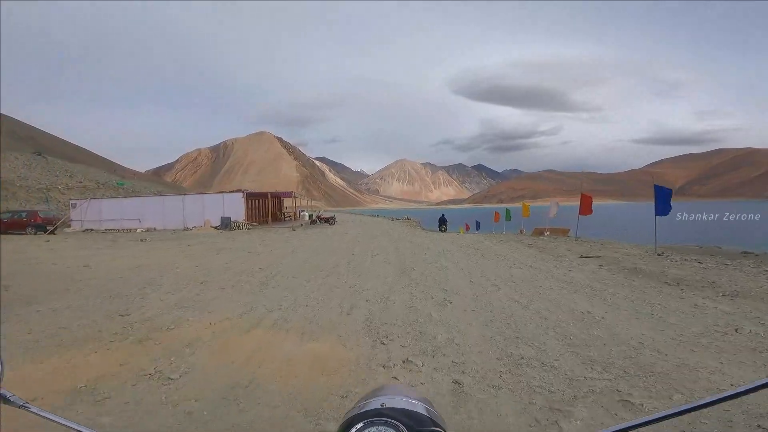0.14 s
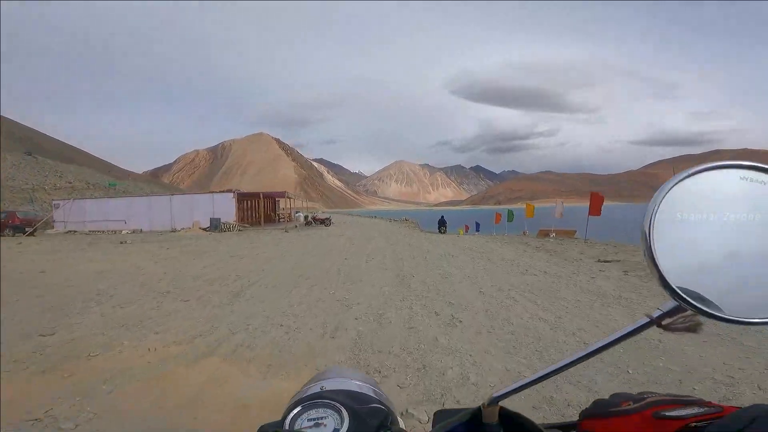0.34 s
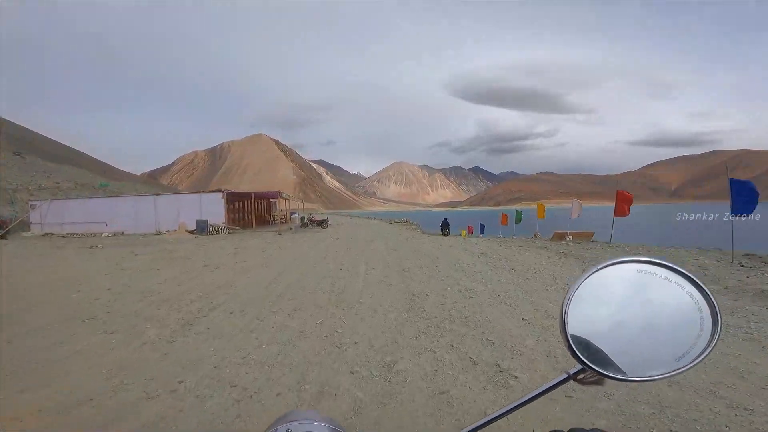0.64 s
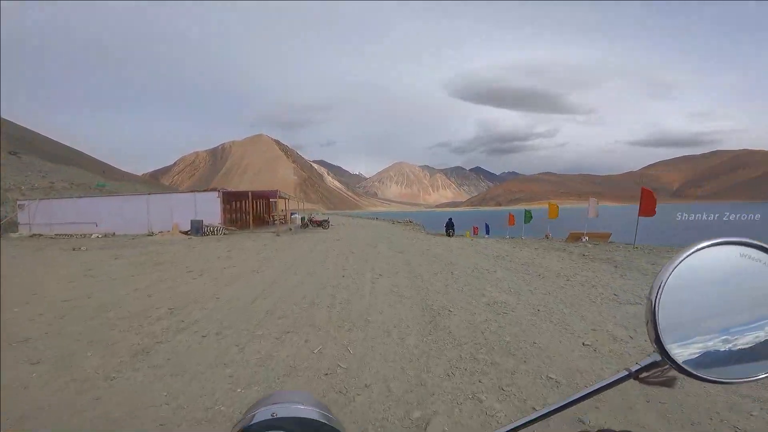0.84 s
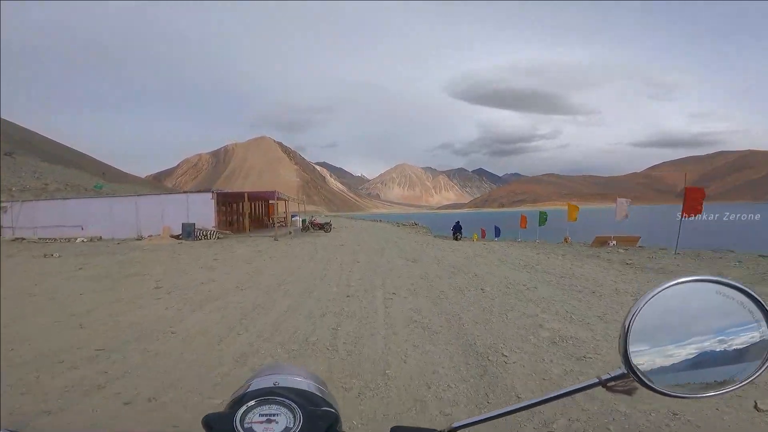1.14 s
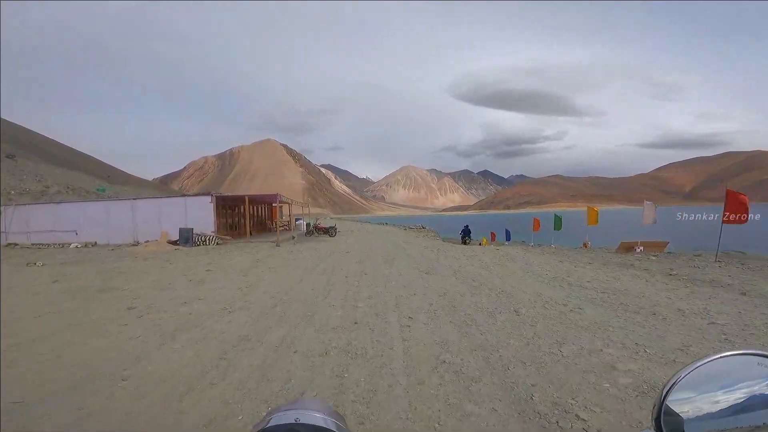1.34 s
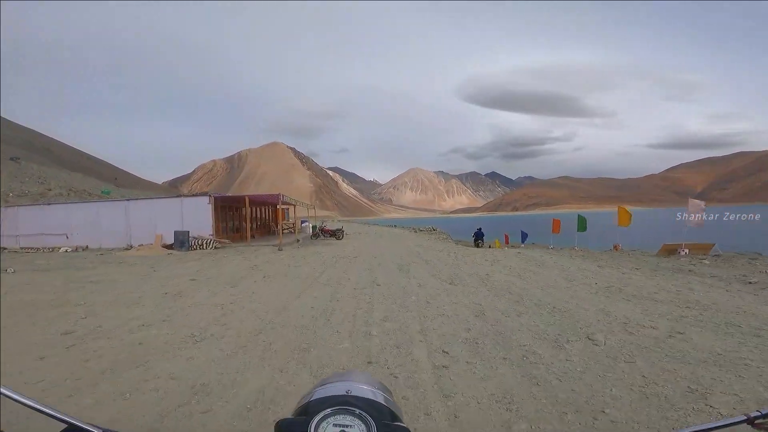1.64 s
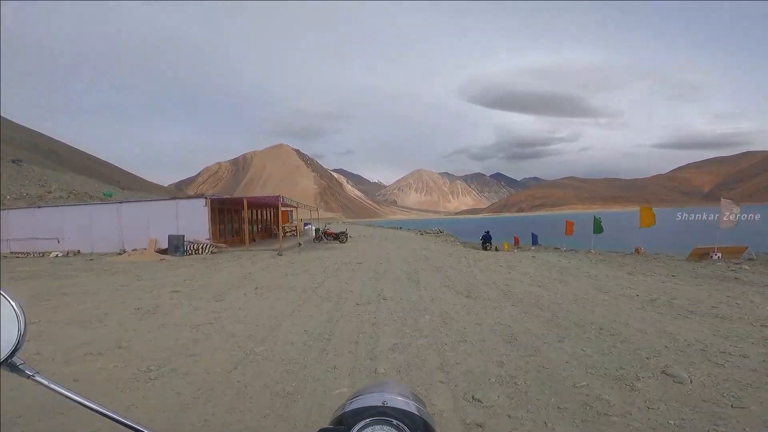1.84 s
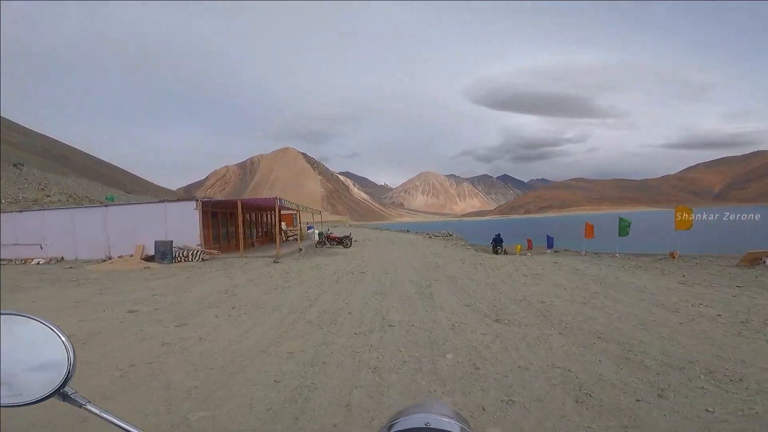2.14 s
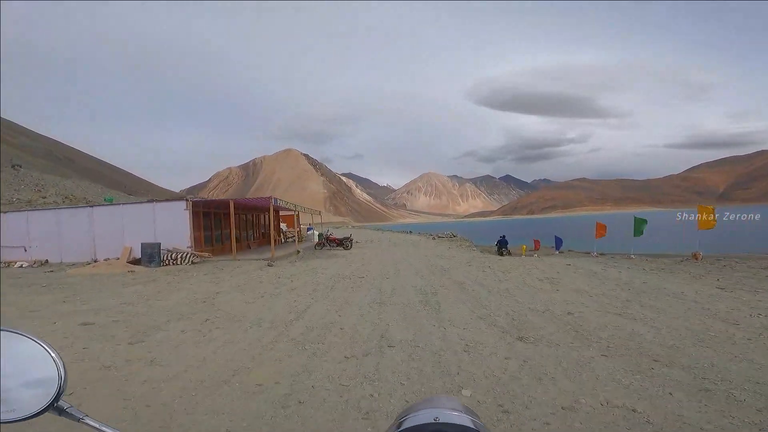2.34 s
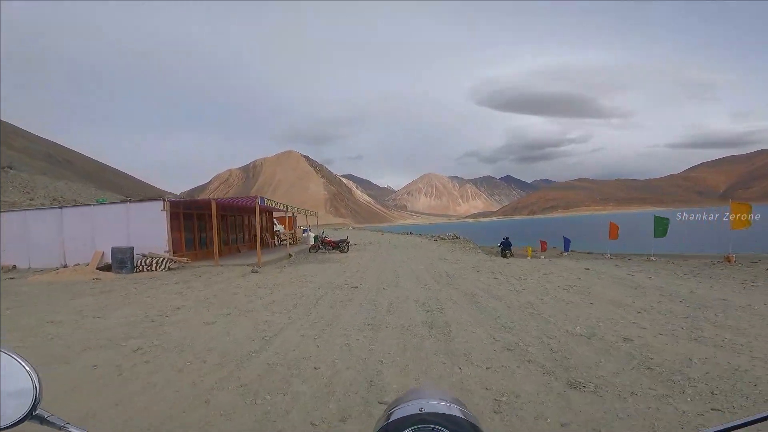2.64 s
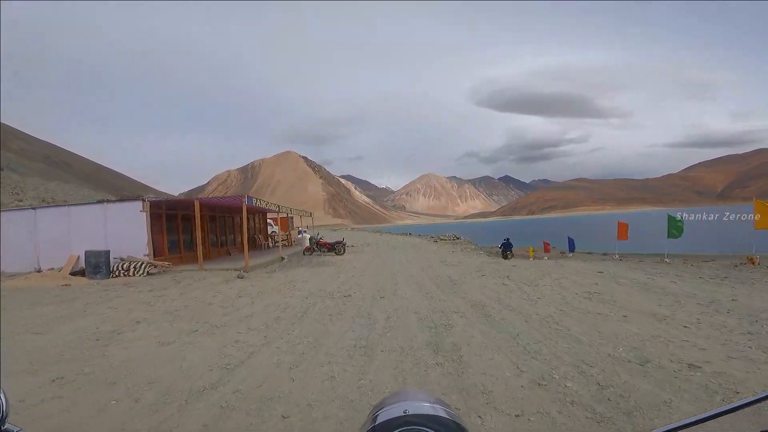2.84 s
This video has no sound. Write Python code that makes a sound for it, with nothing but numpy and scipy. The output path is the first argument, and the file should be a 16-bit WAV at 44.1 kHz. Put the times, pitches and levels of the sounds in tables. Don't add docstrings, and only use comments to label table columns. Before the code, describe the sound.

A single-cylinder motorcycle thumps slowly, sags, then pulls away louder and faster on open gravel; wind roars and slams the rider's small microphone, with scattered stone knocks and brief metallic ticks.

```python
import sys
import numpy as np
from scipy import signal
from scipy.io import wavfile
from scipy.ndimage import uniform_filter1d, minimum_filter1d

SR = 44100
rng = np.random.default_rng(int(sys.argv[2]) if len(sys.argv) > 2 else 0)


def volts_from_db(level):
    exponent = np.asarray(level, float) / 20
    return 10 ** exponent


def store_pcm(level_fs):
    pcm = np.round(np.clip(level_fs, -1, 1) * 32767).astype(np.int16)
    wavfile.write(sys.argv[1], SR, np.atleast_2d(pcm).T)


N = 132300

# time_s, firings_per_s
FIRING_RATE = [
    (0.0, 9.008),
    (0.35, 7.912),
    (0.7, 7.373),
    (1.1, 7.365),
    (1.5, 7.269),
    (1.8, 7.573),
    (2.0, 9.252),
    (2.2, 10.88),
    (2.6, 12.656),
    (3.0, 14.432),
]
# time_s, level_db
THROTTLE = [(0, -7), (.42, -9.5), (.6, -10), (.95, -23.5), (1.25, -11.5), (1.5, -9.5), (1.66, -9.5),
            (1.88, -3), (2.02, -7.5), (2.22, 1.5), (2.47, 1), (2.56, -3.5), (2.72, 2.5), (2.82, -4),
            (3, -1.5)]
# pitch_hz, gain_db, t60_s
PIPE_MODES = [
    (76.2, -4, 0.068),
    (127.96, -20.5, 0.16),
]
# time_s, level_db, mid_roar_relative_db
WIND_LEVEL = [(0, -27, -13), (.19, -22.5, -14.5), (.3, -23, -21), (.44, -22.5, -19.5), (.62, -26.5, -15),
              (.78, -27, -6.5), (.98, -28.5, -0.5), (1.05, -23.5, -23.5), (1.19, -26, -13.5),
              (1.5, -26.5, -14), (1.65, -30, -15.5), (1.87, -27, -9.5), (2.18, -28.5, -17),
              (2.27, -26, -4.5), (2.45, -24, -1.5), (2.6, -25.5, -19), (2.75, -23.5, -17), (2.88, -31, -3)]
# pitch_hz, density_db_per_hz
WIND_COLOUR = [(45, -11), (150, -12.5), (450, -18), (1000, -38.5), (2500, -53), (4500, -74.5),
               (8000, -74.5), (16000, -94.5)]
# time_s, gain_db
SHELTER = [(0, -1), (.12, -1.5), (.3, -3), (.55, -2), (.65, -3.5), (.9, 0), (1.1, -4), (1.3, -4.5),
           (1.55, 0), (1.7, -4.5), (1.95, 0.5), (2.1, -1), (2.3, 1.5), (2.5, -3), (2.65, -2), (2.85, -1.5),
           (3, 7)]
# start_s, size_db
SLAMS = [(-.04, -0.5), (0.077, -2), (0.232, 3.5), (0.438, -2.5), (.5, -5.5), (0.571, 3), (0.819, -1.5),
         (1.013, 6), (1.211, 3), (1.41, 5.5), (1.575, 5), (1.798, -10), (1.919, 1), (1.999, -3),
         (2.119, -2.5), (2.279, -2), (2.472, 2.5), (2.6, 2.5), (2.678, -3.5), (2.792, -1), (2.959, -3)]
# time_s, level_db
FLUTTER = [(0.04, -22), (0.2, -20.5), (0.27, -12), (0.54, -19), (0.64, -22.5), (1.6, -21.5), (1.68, -28),
           (2.01, -8.5), (2.03, -20), (2.17, -15), (2.92, -23), (2.95, -25.5)]
# time_s, level_db
GRAVEL = [(0, -54), (.16, -70.5), (.26, -47), (.45, -62), (.68, -54), (.75, -47.5), (.9, -52), (1.08, -59),
          (1.17, -48.5), (1.25, -59), (1.5, -60.5), (1.69, -62), (1.79, -50.5), (1.93, -81), (2.2, -76.5),
          (2.44, -69.5), (2.6, -68.5), (3, -59)]
# pitch_hz, gain_db, t60_s
GRIT_RINGS = [
    (1600, 2, 0.0038),
    (2870, 2.5, 0.00078),
    (4930, -1.5, 0.00091),
    (7960, -3, 0.0007),
]
# centre_s, level_db, pitch_hz, length_s
SQUEAKS = [
    (1.021, -48, 4080, .006),
    (1.202, -45, 5000, .004),
    (.757, -53, 7700, .003),
    (2.727, -56, 7800, .005),
]
# start_s, peak_db, pitch_hz
GUSTS = [(.18, -20.5, 276), (.24, -31, 680), (.39, -22.5, 272), (.46, -23, 336), (.53, -24.5, 255),
         (.79, -29.5, 818), (.99, -24, 506), (1.04, -33, 420), (1.15, -23, 300), (1.18, -29.5, 500),
         (1.54, -27.5, 420), (1.8, -29, 494), (2.25, -29.5, 794), (2.46, -20.5, 207), (2.76, -21.5, 215),
         (2.93, -23, 239)]
# start_s, peak_db, pitch_hz
SPRAYS = [
    (.225, -44, 3150),
    (.24, -41, 1680),
    (.27, -54, 3180),
    (.77, -52, 3650),
    (1.16, -37.5, 1510),
    (1.76, -49.5, 2790),
    (1.79, -42.5, 1690),
    (1.97, -44, 1460),
    (2.74, -44.5, 1770),
    (2.93, -48, 2610),
]
# start_s, peak_db, low_part_relative_db, ring_hz, body_hz
TICKS = [(0.234, -42, -11.5, 7900, 2000), (0.2377, -36.5, -13, 8140, 3000), (.575, -54, 11, 7800, 3880),
         (.64, -48, 3, 7900, 3000), (0.7281, -22.5, 5.5, 7900, 1370), (0.8485, -33, 5, 8100, 1900),
         (.9522, -23.5, -1.5, 7960, 2550), (1.031, -48, 6.5, 6900, 4000), (1.1052, -27.5, -6, 8370, 3360),
         (1.1675, -43, 1.5, 8100, 3460), (1.193, -42.5, -8, 8400, 2620), (1.1994, -51, 7.5, 6700, 4940),
         (1.217, -44, 0, 6200, 2580), (1.404, -46.5, 10, 8700, 1700), (1.593, -48, 8, 8450, 3770),
         (2.0208, -55, 9, 7700, 2820), (2.4174, -41, 0, 7200, 2530), (2.4312, -43.5, 0.5, 8100, 3420)]
# start_s, peak_db, pitch_hz
STONES = [(.261, -36.5, 3170), (.271, -32, 1810), (.282, -34, 1500), (.6694, -45, 2500),
          (1.0076, -35, 1660), (1.139, -45, 4600), (1.173, -24, 1600), (1.1902, -26, 1830),
          (1.209, -30, 2380), (1.5589, -33.5, 2000), (1.7449, -35, 3000), (1.7704, -31, 1830),
          (1.795, -41, 2560), (1.82, -33.5, 2700), (1.8357, -32, 2350), (1.838, -45.5, 4760),
          (1.89, -47, 2150), (1.982, -51, 4400), (2.9248, -25, 1720), (.7285, -26, 1140), (.729, -33, 2920),
          (.851, -17.5, 1400), (.953, -16.5, 1470), (2.4309, -49.5, 5400), (.235, -39, 2000),
          (.25, -42, 3400), (.296, -40, 3000), (.315, -35, 1900), (1.78, -46, 2950), (1.805, -30, 1910),
          (2.0228, -31, 1600), (.852, -40, 4150), (.9535, -22.5, 3050), (1.1065, -33, 3560),
          (.729, -19, 5000)]
# start_s, peak_db, pitch_hz
POPS = [(0.444, -20, 463), (0.493, -19.5, 480), (0.706, -27, 637), (0.907, -26.5, 748), (1.549, -23, 461),
        (1.574, -16, 527), (1.626, -32, 466), (1.935, -27.5, 558), (2.199, -22, 504), (2.223, -19.5, 673),
        (2.62, -25.5, 482), (2.704, -18, 458), (2.883, -33.5, 536)]


def level(x, db):
    return x * volts_from_db(db) / np.sqrt(np.mean(x ** 2))


def band(x, hz, width_hz):
    return signal.lfilter(*signal.iirpeak(min(hz, .45 * SR), hz / width_hz, fs=SR), x)


def steep(x, hz, width_hz):
    return band(band(x, hz, width_hz), hz, width_hz)


def noise():
    return rng.standard_normal(N)


def ring(x, hz, t60_s):
    pole = np.exp(2j * np.pi * hz / SR - np.log(1000) / (t60_s * SR))
    return signal.lfilter([1], [1, -pole], x).imag


def walk(rate_hz):
    hold = int(SR / rate_hz)
    held = np.repeat(rng.standard_normal(N // 100), hold)[:N + hold]
    return 1.07 * uniform_filter1d(uniform_filter1d(held, hold), hold)[:N]


def curve(table, index):
    table = np.array(table)
    return np.interp(np.arange(N) / SR, table[:, 0], table[:, index])


def push(at, size, length_s):
    x = np.zeros(N + SR)
    np.add.at(x, np.maximum(at, 0), size)
    shape = np.hanning(int(length_s * SR) + 2)
    return signal.fftconvolve(x, shape / shape.sum())


def burst(n, hz, width_hz, t60_s, rise_s):
    t = np.arange(len(n)) / SR
    x = steep(n, hz, width_hz)
    return x / np.std(x) * np.exp(-np.log(1000) * t / t60_s) * np.minimum(t / rise_s, 1)


def knocks(table, t60_s, q):
    out = np.zeros(N + SR)
    for (s, db, hz), n in zip(table, rng.standard_normal((40, 2048))):
        out[int(s * SR):][:2048] += volts_from_db(db) * burst(n, hz, hz / q, t60_s, rise_s=.0015)
    return out[:N]


def swells(table, q):
    out = np.zeros(N + SR)
    size = int(.07 * SR)
    for (s, db, hz), n in zip(table, rng.standard_normal((20, 8192))):
        x = steep(n, hz, hz / q)
        out[int(s * SR):][:size] += volts_from_db(db) * x[-size:] / np.std(x) * np.hanning(size)
    return out[:N]


def engine():
    start_phase, pipe_lead_s = .476, .0064
    push_s, gas_s, gas_db = .0027, .031, -41.5
    phase = start_phase + np.cumsum(curve(FIRING_RATE, index=1)) / SR
    at = np.flatnonzero(np.diff(np.floor(phase))) - int(pipe_lead_s * SR)
    scatter_db = .94 * rng.standard_normal(64)[:len(at)]
    size = volts_from_db(curve(THROTTLE, index=1)[at] + scatter_db)
    pulses = ring(push(at, size, push_s)[:N], hz=115.2, t60_s=.19) * 550 / SR
    pipe = -sum(volts_from_db(db) * ring(pulses, hz, t60_s) for hz, db, t60_s in PIPE_MODES)
    puff = push(at, size, gas_s)[:N] * gas_s * SR
    hiss = level(steep(noise(), 600., 760.), 0)
    return pipe + volts_from_db(gas_db) * puff * hiss


def wind():
    roar_hz, roar_octaves, roar_slope, roar_ref_db = 840, .5, .78, -12.5
    shelter_hz = 420
    colour_hz, colour_db = np.array(WIND_COLOUR).T
    roar_db = roar_slope * (curve(WIND_LEVEL, index=2) - roar_ref_db)
    out, shared = 0, walk(6.7)
    for hz in 45 * 2 ** np.arange(0, 8.5, 1 / 3):
        shared = .71 * shared + .83 * walk(8.67)
        db = np.interp(np.log(hz), np.log(colour_hz), colour_db) + 10 * np.log10(hz)
        db = db + shared + 1.63 * walk(25.07)
        db = db + 2 * walk(120.) * (hz > 400)
        db = db + roar_db * np.exp(-(np.log2(hz / roar_hz) / roar_octaves) ** 2 / 2)
        db = db + curve(SHELTER, index=1) / (1 + (hz / shelter_hz) ** 4)
        out = out + volts_from_db(db) * level(steep(noise(), hz, hz / 3), 0)
    return level(out, 3.22) * volts_from_db(curve(WIND_LEVEL, index=1))


def buffet():
    slam_hz, slam_t60_s, rise_s = 3.0, .7, .035
    lead_s = .1
    start_s, size_db = np.array(SLAMS).T
    at = ((start_s + lead_s) * SR).astype(int)
    slams = ring(push(at, volts_from_db(size_db), rise_s), slam_hz, slam_t60_s)
    steps = np.gradient(slams)[int(lead_s * SR):][:N] * SR / (2 * np.pi * slam_hz)
    flutter = level(steep(noise(), 20., 47.2), 0) * volts_from_db(curve(FLUTTER, index=1))
    sway = level(steep(noise(), 8, 16.3), -21)
    return steps + flutter + sway


def grit():
    grains_per_s, spread_db = 2000, 2.6
    when = rng.random((4, N))
    size = rng.exponential(size=(4, N))
    strength = volts_from_db(spread_db * size + 1.1 * walk(36.))
    hits = (when < grains_per_s / SR) * strength * np.sign(noise())
    crunch = 0
    for grains, (hz, db, t60_s) in zip(hits, GRIT_RINGS):
        crunch = crunch + volts_from_db(db) * band(ring(grains, hz, t60_s), hz, hz / 2)
    return level(crunch, 0) * volts_from_db(curve(GRAVEL, index=1))


def squeaks():
    whistle_end_s, whistle_fade_s = .17, .11
    t = np.arange(N) / SR
    out = level(steep(noise(), 13000, 1100), -66)
    out = out * np.clip((whistle_end_s - t) / whistle_fade_s + 1, 0, 1)
    for s, db, hz, length_s in SQUEAKS:
        out = out + volts_from_db(db) * np.sin(2 * np.pi * hz * t) * np.exp(-((t - s) / length_s * 2) ** 2)
    return out


def gusts():
    return swells(GUSTS, q=2)


def sprays():
    return swells(SPRAYS, q=2.53)


def ticks():
    high_t60_s, low_t60_s, air_db, shell_db = .014, .024, -10, -23.5
    out = np.zeros(N + SR)
    for (s, db, low_db, hz, body_hz), n in zip(TICKS, rng.standard_normal((40, 4, 2048))):
        housing = burst(n[0], hz, 890., high_t60_s, .003)
        crack = burst(n[1], 11000., 9000., high_t60_s, .00078)
        body = burst(n[2], body_hz, 1.1 * body_hz, low_t60_s, .002)
        shell = burst(n[3], 4760, 2500., low_t60_s, .0038)
        high = housing + volts_from_db(air_db) * crack
        low = body + volts_from_db(shell_db) * shell
        out[int(s * SR):][:2048] += volts_from_db(db) * (high + volts_from_db(low_db) * low)
    return out[:N]


def stones():
    return knocks(STONES, t60_s=.0091, q=2.1)


def pops():
    return knocks(POPS, t60_s=.037, q=2.96)


def scene():
    air = engine() + wind() + buffet() + gusts() + pops()
    road = grit() + squeaks() + sprays() + ticks() + stones()
    return (air + road)[None]


def band_limit(x):
    return signal.sosfilt(signal.butter(12, 15800, fs=SR, output="sos"), x)


def record(dry):
    ceiling, release_s, drive = .93, .026, 1.224
    x = drive * (dry - dry.mean())
    k = int(release_s * SR)
    gain = np.minimum(ceiling / (np.abs(x) + 1e-9), 1)
    gain = minimum_filter1d(gain, k, axis=1)
    x = x * uniform_filter1d(gain, k, axis=1)
    return band_limit(x - .5 * x.mean())


dry = scene()
out = record(dry)
store_pcm(out)
```